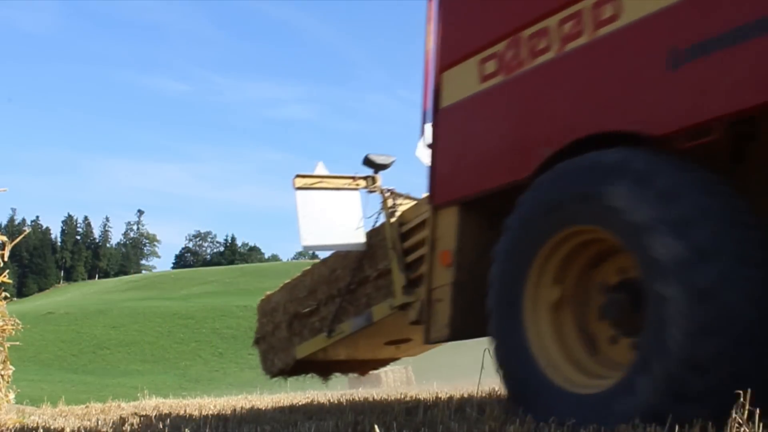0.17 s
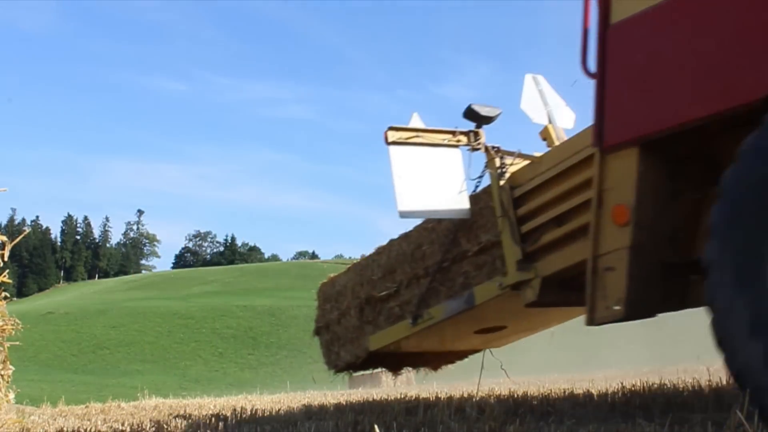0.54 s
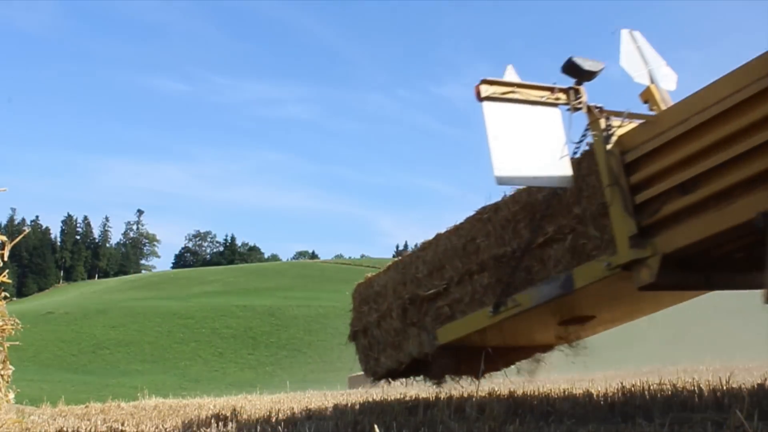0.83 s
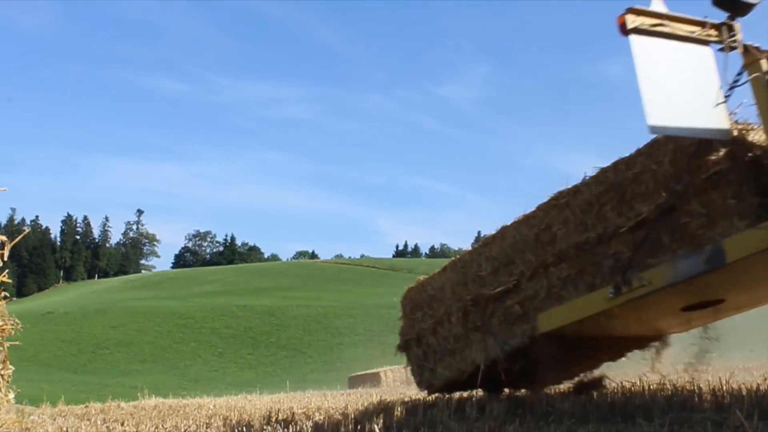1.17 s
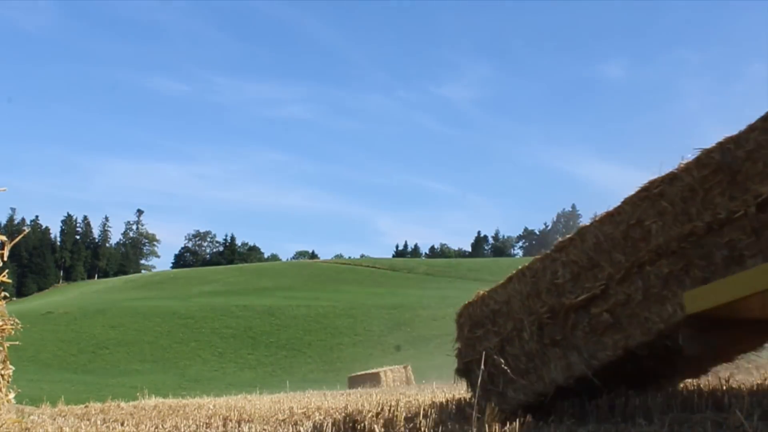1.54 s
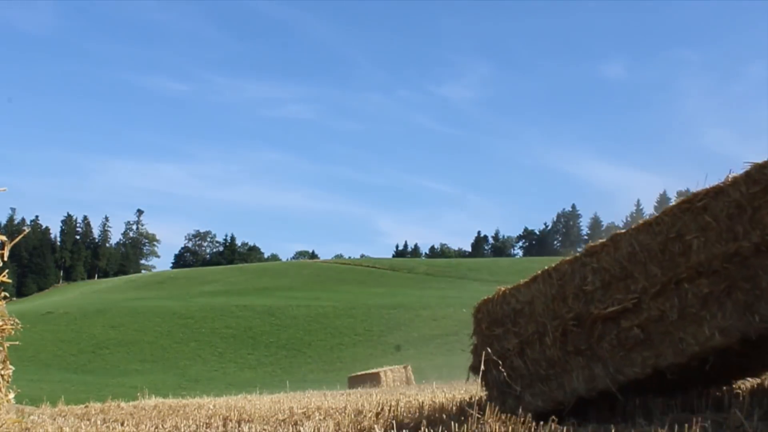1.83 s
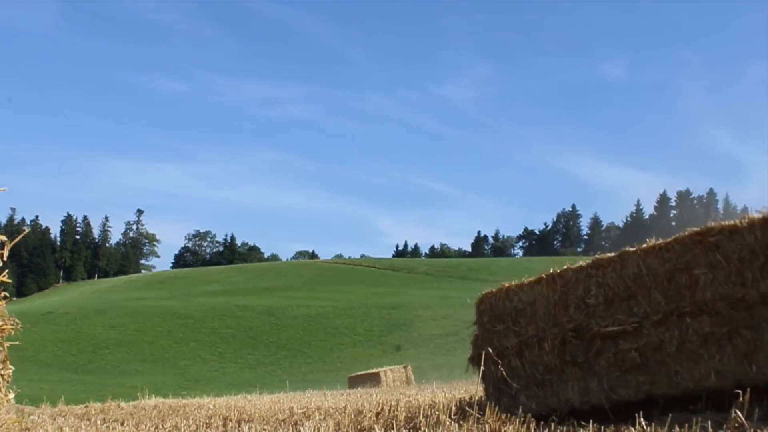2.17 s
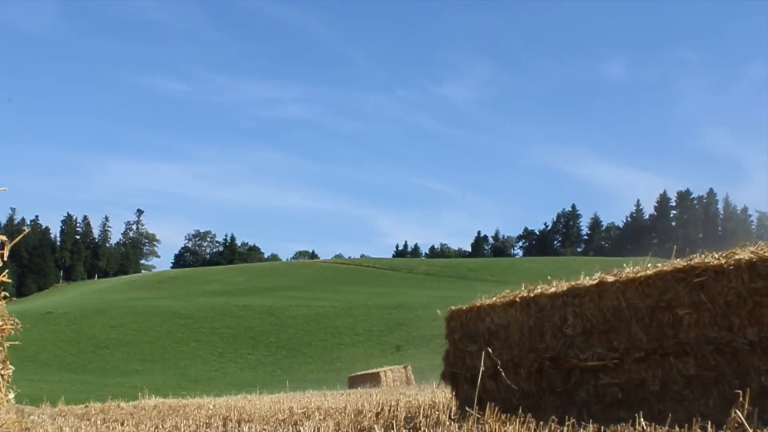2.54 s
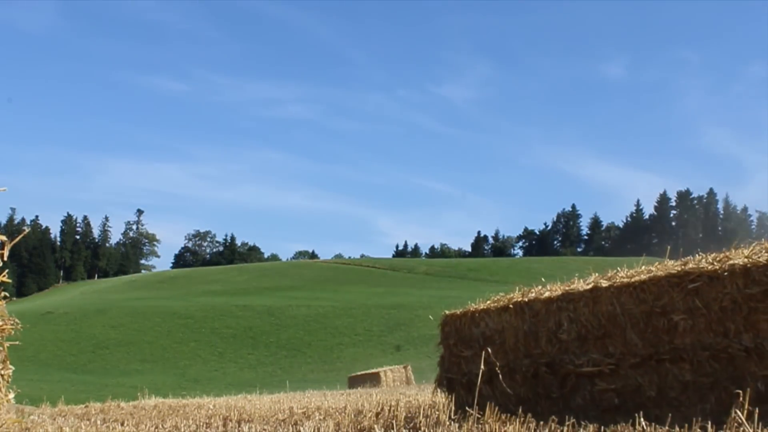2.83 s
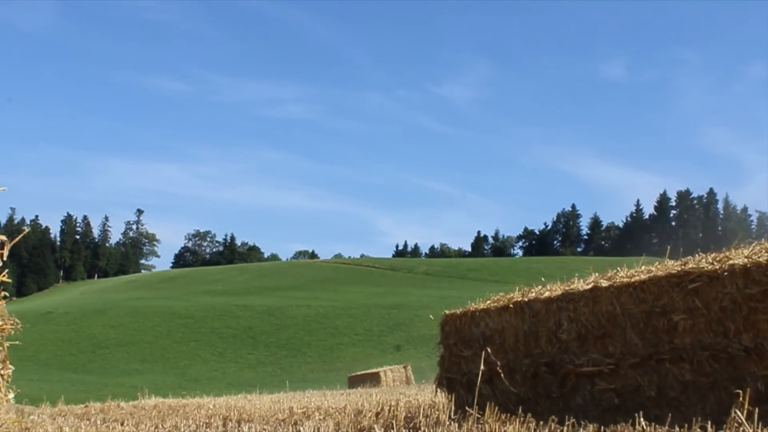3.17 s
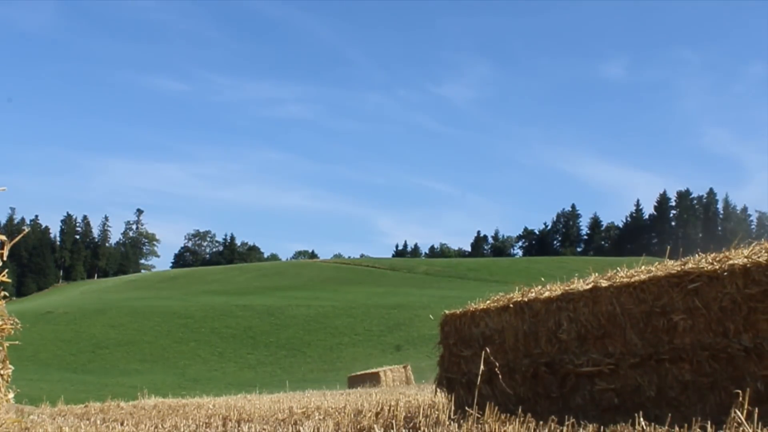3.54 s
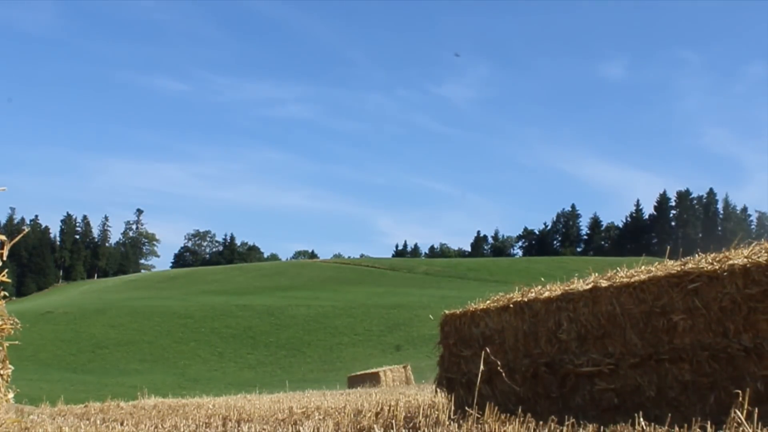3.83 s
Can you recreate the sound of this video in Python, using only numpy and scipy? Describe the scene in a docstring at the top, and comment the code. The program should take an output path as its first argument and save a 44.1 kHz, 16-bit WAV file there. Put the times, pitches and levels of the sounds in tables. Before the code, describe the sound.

A tractor and baler pass close in an open field: low engine drone near 100 Hz, heavy rumble, jolting booms, sheet-metal clatter and bangs, loudest until 0.9 s. Chain jingles, high roller squeaks and dry straw hiss overlay it. Dull knocks at 0.2, 0.65 and 1.05-1.1 s precede a ringing steel clack at 1.14 s. The machine recedes; stubble crunches softly around 2.0-2.3 s, chain slaps continue sparsely, and faint airy rush remains to 4 s.

```python
"""Engine drone and rumbling, clattering sheet metal come first: a tractor draws a square baler past and away.
A drive chain jingles and slaps, a dry roller squeaks, stubble hisses; the chute clacks, then the bale lands.
Engine, hum and squeaks are wavering sines; the rest is coloured noise under level curves and blow envelopes,
plus sine knocks in the bale chamber. Sheet metal and chute add resonant modes.
"""
import sys
import numpy as np
from scipy import signal
from scipy.fft import rfft, irfft, next_fast_len
from scipy.io import wavfile
from scipy.ndimage import uniform_filter1d, map_coordinates

SR = 44100
rng = np.random.default_rng(int(sys.argv[2]) if len(sys.argv) > 2 else 0)


def wav_out(sig):
    """Save sig, one row per channel (or a flat mono array), as 16-bit PCM at SR to the path in sys.argv[1]."""
    wavfile.write(sys.argv[1], SR, np.round(np.clip(np.atleast_2d(sig).T, -1, 1) * 32767).astype(np.int16))


N = 176400
TIME_S = np.arange(N) / SR
NEAR_UNTIL_S, FAR_FROM_S = 0.78, 2.58
TOP_HZ = 15780

# trims by layer: trim_db, added to a level curve (air: to the side noise's low band only)
TRIM_DB = {"rumble": -0.5, "clatter": 2, "chain": -1, "straw": 3, "air": -12.5}

# engine firing note: time_s, firing_hz, level_db
ENGINE_NOTE = [(0, 101, -33.5), (.6, 96, -34), (.9, 101, -38), (1.3, 106, -40), (1.7, 101, -47),
               (2.1, 102, -44.5), (2.85, 103, -49.5), (3.3, 104, -55), (4, 102, -54.5)]
# drive shaft hum: pitch_hz, near_level_db, far_level_db
SHAFT_HUM = [(155.3, -38.5, -60.5), (220.4, -38.5, -65), (271.7, -40, -51), (318.3, -50, -59.5),
             (372, -39, -64), (570, -50, -62)]
NOTE_WAVER_NEAR_HZ, NOTE_WAVER_FAR_HZ, HUM_WAVER_HZ = 5.77, 2.45, 8

# housing rumble before trim: time_s, level_db
RUMBLE_LEVEL = [(0.0, -28.5), (0.04, -20.5), (0.2, -24.5), (0.5, -24), (0.55, -21.5), (0.62, -27),
                (0.65, -20.5), (0.72, -25.5), (0.81, -19.5), (0.87, -24.5), (1.2, -30.5), (1.68, -36.5),
                (1.95, -35.5), (2.2, -36), (2.94, -44.5), (3.64, -45), (4.0, -48)]
# housing colour, near: freq_hz, gain_db
BODY_NEAR_COLOUR = [(20, -54), (45, -26), (65, -24), (85, -1.5), (125, -4), (220, 0.5), (290, -1),
                    (340, -5.5), (480, -8.5), (700, -13.5), (1100, -23), (1800, -31.5), (4000, -85)]
# housing colour, far: freq_hz, gain_db
BODY_FAR_COLOUR = [(20, -48), (45, -24), (65, -13.5), (90, -3.5), (125, -3.5), (290, 0), (350, -6.5),
                   (480, -6.5), (830, -14.5), (1020, -22), (1600, -31.5), (4000, -83)]
# heavy machinery jolts: start_s, hold_s (rattle only), rattle_level_db, boom_level_db
MACHINE_JOLTS = [(0.051, 0.016, -30.5, -19), (.133, 0.024, -32.5, -27), (0.516, 0.016, -30.5, -27),
                 (.662, 0.03, -33, -19), (0.776, .02, -38.5, -23), (.861, .012, -39, -39)]
BOOM_RISE_S, BOOM_T60_S = 0.0043, 0.18
# dull bale chamber knocks: start_s, level_db
CHAMBER_KNOCKS = [(0.228, -16), (0.649, -12), (1.054, -15), (1.097, -9.5)]
KNOCK_HZ, KNOCK_RISE_S, KNOCK_T60_S = 220, 0.0023, 0.022

# panel and tine clatter before trim and ring: time_s, level_db
CLATTER_LEVEL = [(0.0, -32), (0.43, -37), (0.65, -38), (1.54, -49.5), (1.75, -50), (2.15, -54), (2.27, -54),
                 (2.78, -56.5), (4.0, -71)]
# rattling panel colour: freq_hz, gain_db
PANEL_COLOUR = [(200, -47), (600, 4.5), (1000, 2), (1600, -5), (2600, -2.5), (4200, -6.5), (5500, -13.5),
                (8000, -18), (15000, -33.5)]
RATTLE_RISE_S, RATTLE_T60_S = 0.00093, 0.099
# loose panel bangs before ring: start_s, level_db
PANEL_BANGS = [(.148, -24), (.525, -22), (.784, -25), (.802, -25.5), (.862, -27)]
# bang colour: freq_hz, gain_db
BANG_COLOUR = [(150, -13), (450, 0.5), (750, 3), (1300, -13), (2300, -7.5), (3500, -20), (9000, -41)]
BANG_RISE_S, BANG_T60_S = 0.0005, 0.075
# sheet metal modes: freq_hz, width_hz, gain_db
SHEET_MODES = [(1282, 10, -1), (1465, 13, -6), (1653, 14, -11), (2086, 20, -7), (2330, 23, -4),
               (2600, 15, -6), (3250, 23, -4), (4600, 13, -2)]

# chain jingle before trim: time_s, level_db
CHAIN_LEVEL = [(0.0, -31.5), (0.18, -43), (0.51, -40), (1.79, -50), (2.08, -46), (2.22, -51), (3.2, -56),
               (3.51, -50.5), (3.66, -58), (4.0, -63.5)]
# chain link colour: freq_hz, gain_db
LINK_COLOUR = [(1200, -50.5), (2000, -10.5), (2550, -5), (3000, -2), (3550, 5.5), (3950, -0.5),
               (4500, -14.5), (6000, -40), (12000, -42)]
# chain slaps: start_s, level_db
CHAIN_SLAPS = [(0.33, -32), (0.982, -36.5), (1.365, -41.5), (1.489, -39), (1.522, -43), (1.732, -37),
               (1.782, -47), (1.851, -50), (1.986, -38), (2.355, -45), (2.48, -46.5), (3.081, -46.5),
               (3.612, -44.5)]
# slap colour: freq_hz, gain_db
SLAP_COLOUR = [(1500, -27), (2800, -13.5), (3600, -0.5), (4000, -10), (4600, -22), (10000, -30)]
SLAP_RISE_S, SLAP_T60_S = 0.00063, 0.12

# straw hiss before trim: time_s, level_db
STRAW_LEVEL = [(0.0, -48), (0.85, -51.5), (1.2, -54), (1.5, -51.5), (2.44, -60), (4.0, -65.5)]
# dry stalk colour: freq_hz, gain_db
STALK_COLOUR = [(1000, -7.5), (3000, 6), (6000, 1.5), (9000, 0), (12000, -1.5), (16000, -3)]
# straw scraping on steel: centre_s, length_s, level_db
STEEL_SCRAPES = [(.52, 0.016, -50.5), (1.261, 0.012, -42)]

# diffuse side noise: time_s, level_db
SIDE_LEVEL = [(0, -65), (1.8, -58.5), (3, -58), (4, -60.5)]
# diffuse side noise, low band colour: freq_hz, gain_db
SIDE_LOW_COLOUR = [(30, 11), (250, -5.5), (600, 4), (2600, -15), (9000, -52)]
# field sound, high band colour: freq_hz, gain_db
AIR_HIGH_COLOUR = [(500, -28), (3700, -32), (4500, -7), (6300, -0.5), (9000, 1), (16000, 0.5)]

# dry roller squeaks: centre_s, pitch_hz (at centre, before waver), level_db (short part)
ROLLER_SQUEAKS = [(.005, 7970, -40), (.057, 7900, -37), (.12, 7750, -48), (.375, 14900, -54),
                  (.432, 14850, -54), (0.792, 7800, -44), (0.838, 8050, -53), (0.89, 8100, -49),
                  (.962, 8160, -48), (1.009, 8200, -49), (1.125, 7850, -49), (1.813, 7730, -53),
                  (2.55, 7700, -64), (2.652, 7980, -58), (2.769, 8020, -59), (2.823, 8300, -57.5)]
SQUEAK_LENGTH_S, SQUEAK_RISE_HZ_PER_S, SQUEAK_WAVER_HZ = 0.014, 2300, 112
LONG_NOTE_DB, LONG_NOTE_LENGTH_S = -9.5, 0.071

# chute clacks before ring: start_s, level_db
CHUTE_CLACKS = [(1.1385, -23), (1.147, -27.5), (1.160, -36)]
# clack colour: freq_hz, gain_db
CLACK_COLOUR = [(300, -20), (1300, -13), (1900, 0), (2600, 2), (4400, 4), (5200, -6.5), (9500, -13.5),
                (12000, -22), (16000, -27)]
# steel chute modes: freq_hz, width_hz, gain_db
CHUTE_MODES = [(1805, 33, -3), (2600, 15, 4), (3510, 20, 4.5), (3940, 15, 7), (4575, 12, 7),
               (5860, 18, 10.5)]
CLACK_RISE_S, CLACK_T60_S = 0.0006, 0.085

# bale crushing stubble: centre_s, length_s, level_db
BALE_CRUNCHES = [(2.013, 0.068, -46.5), (2.086, 0.052, -43.5), (2.196, 0.077, -43.5), (2.282, .045, -54)]
# crushed stubble colour: freq_hz, gain_db
CRUSH_COLOUR = [(150, -6), (500, -2), (1100, 4), (1700, -6), (3000, 0.5), (4600, -3.5), (6000, -12),
                (15000, -26)]


def amp(db):
    """Amplitude factor from dB."""
    return 10 ** (np.asarray(db) / 20)


def unit(x):
    """x at rms 1."""
    return x / np.sqrt(np.mean(x ** 2) + 1e-20)


def curves(rows):
    """One value per sample for each column after the time."""
    time_s, *columns = np.transpose(rows)
    return [np.interp(TIME_S, time_s, column) for column in columns]


def wobble(knots_per_s):
    """Smooth random curve through random knots."""
    return map_coordinates(rng.standard_normal(4000), [TIME_S * knots_per_s + 2], mode="wrap")


def colour(x, points):
    """x through a causal minimum-phase filter of (freq_hz, gain_db) points, at rms 1."""
    size = 2 * next_fast_len(N // 2 + 8192)
    point_hz, point_db = np.transpose(points)
    log_hz = np.log(np.fft.rfftfreq(size, 1 / SR) + 1)
    gain_db = np.interp(log_hz, np.log(point_hz), point_db)
    # folded cepstrum: minimum phase
    cepstrum = irfft(np.log(amp(gain_db)))
    cepstrum[1:size // 2] *= 2
    cepstrum[size // 2 + 1:] = 0
    response = np.exp(rfft(cepstrum))
    return unit(irfft(rfft(x, size) * response)[:N])


def contacts(rate_hz, spread_db, t60_s, wash):
    """Random impacts as decaying noise bursts over steady noise; wash = steady / mean impact power."""
    struck = rng.random(N) < rate_hz / SR
    hit_power = struck * amp(spread_db * (2 * rng.random(N) - 1)) ** 2
    power_decay = np.exp(-2 * np.log(1000) / (t60_s * SR))
    power = signal.lfilter([1], [1, -power_decay], hit_power)
    return unit(np.sqrt(power / power.mean() + wash) * rng.standard_normal(N))


def strike(start_s, rise_s, t60_s, hold_s=0):
    """Blow envelope: exponential rise, optional hold, exponential decay."""
    t_s = np.maximum(TIME_S - start_s, 0)
    decay = np.exp(-np.log(1000) * np.clip((t_s - hold_s) / t60_s, 0, 10))
    return (1 - np.exp(-t_s / rise_s)) * decay


def swell(centre_s, length_s):
    """Gaussian envelope; length_s is two standard deviations."""
    return np.exp(-np.minimum(2 * ((TIME_S - centre_s) / length_s) ** 2, 50))


def tone(pitch_hz, waver_hz, flutter_db):
    """Sine of unsteady pitch and level, at rms 1."""
    phase = 2 * np.pi * np.cumsum(pitch_hz + waver_hz * wobble(18)) / SR
    return unit(np.sin(phase) * amp(flutter_db * wobble(14)))


def churn(points, evenness):
    """Coloured noise of overlapping motion, its chance lumps partly evened out."""
    x = colour(rng.standard_normal(N), points)
    smooth_once = uniform_filter1d(x ** 2, size=900)
    power = abs(uniform_filter1d(smooth_once, size=900)) + 1e-6
    return unit(x / power ** (evenness / 2))


def ringing(x, modes):
    """x plus its response through resonant steel modes."""
    size = next_fast_len(N + 8192)
    f = np.fft.rfftfreq(size, 1 / SR)
    ring = 0
    for mode_hz, width_hz, gain_db in modes:
        damping = 1j * f * width_hz
        ring = ring + amp(gain_db) * damping / (mode_hz ** 2 - f ** 2 + damping)
    return irfft(rfft(x, size) * (1 + ring), size)[:N]


def farness():
    """0 while the machine is near, rising to 1 when far."""
    return np.clip((TIME_S - NEAR_UNTIL_S) / (FAR_FROM_S - NEAR_UNTIL_S), 0, 1)


def engine():
    """Firing note, wavering most when near, plus drive shaft hum: unsteady sines."""
    firing_hz, level_db = curves(ENGINE_NOTE)
    far = farness()
    waver_hz = NOTE_WAVER_NEAR_HZ + (NOTE_WAVER_FAR_HZ - NOTE_WAVER_NEAR_HZ) * far
    note = amp(level_db) * tone(firing_hz, waver_hz, flutter_db=1)
    hum = sum(amp(near_db + (far_db - near_db) * far) * tone(pitch_hz, HUM_WAVER_HZ, flutter_db=5)
              for pitch_hz, near_db, far_db in SHAFT_HUM)
    return note + hum


def body():
    """Moving parts rumble the housing, jolts boom it; decaying sines knock in the bale chamber."""
    far = farness()
    near_noise = churn(BODY_NEAR_COLOUR, evenness=0.4)
    far_noise = churn(BODY_FAR_COLOUR, evenness=0.18)
    crossfade = np.sqrt(1 - far) * near_noise + np.sqrt(far) * far_noise
    rumble = amp(curves(RUMBLE_LEVEL)[0] + TRIM_DB["rumble"]) * crossfade
    boom_level = sum(amp(db) * strike(s, BOOM_RISE_S, BOOM_T60_S) for s, _, _, db in MACHINE_JOLTS)
    booms = boom_level * churn(BODY_NEAR_COLOUR, evenness=0.56)
    knocks = sum(amp(db) * strike(s, KNOCK_RISE_S, KNOCK_T60_S)
                 * np.sin(2 * np.pi * KNOCK_HZ * (TIME_S - s)) for s, db in CHAMBER_KNOCKS)
    return rumble + booms + knocks


def clatter():
    """Panels and tines rattle in surges and at jolts; a loose panel bangs; sheet metal rings to all."""
    surge = unit(amp(1.6 * wobble(36)))
    level = amp(curves(CLATTER_LEVEL)[0] + TRIM_DB["clatter"])
    run = level * surge * contacts(rate_hz=130, spread_db=0.5, t60_s=0.097, wash=3.3)
    jolt_level = sum(amp(db) * strike(s, RATTLE_RISE_S, RATTLE_T60_S, hold_s)
                     for s, hold_s, db, _ in MACHINE_JOLTS)
    rattle = run + jolt_level * contacts(rate_hz=310, spread_db=6, t60_s=0.012, wash=1)
    bang_level = sum(amp(db) * strike(s, BANG_RISE_S, BANG_T60_S) for s, db in PANEL_BANGS)
    bangs = bang_level * churn(BANG_COLOUR, evenness=1)
    return ringing(rattle.std() * colour(rattle, PANEL_COLOUR) + bangs, SHEET_MODES)


def chain():
    """Links jingle over sprockets as small impacts; slaps are decaying noise bursts."""
    links = contacts(rate_hz=130, spread_db=5, t60_s=0.02, wash=1.7)
    jingle = amp(curves(CHAIN_LEVEL)[0] + TRIM_DB["chain"]) * colour(links, LINK_COLOUR)
    slap_level = sum(amp(db) * strike(s, SLAP_RISE_S, SLAP_T60_S) for s, db in CHAIN_SLAPS)
    return jingle + slap_level * colour(rng.standard_normal(N), SLAP_COLOUR)


def straw():
    """Dry stalks hiss and crackle as small impacts; brief swells scrape on steel."""
    hiss_level = amp(curves(STRAW_LEVEL)[0] + TRIM_DB["straw"])
    scrape_level = sum(amp(db) * swell(s, length_s) for s, length_s, db in STEEL_SCRAPES)
    stalks = contacts(rate_hz=240, spread_db=7, t60_s=0.0072, wash=5)
    return (hiss_level + scrape_level) * colour(stalks, STALK_COLOUR)


def side_noise():
    """Diffuse side noise: a rush of the field in the high band, plus a faint low band."""
    low = colour(rng.standard_normal(N), SIDE_LOW_COLOUR)
    high = colour(rng.standard_normal(N), AIR_HIGH_COLOUR)
    return amp(curves(SIDE_LEVEL)[0]) * (high + amp(TRIM_DB["air"]) * low)


def roller():
    """Dry roller squeaks: short rising sines, each the peak of a fainter, longer note."""
    waver_hz = SQUEAK_WAVER_HZ * wobble(350)
    squeaks = np.zeros(N)
    for centre_s, pitch_hz, level_db in ROLLER_SQUEAKS:
        rise_hz = SQUEAK_RISE_HZ_PER_S * (TIME_S - centre_s)
        phase = 2 * np.pi * np.cumsum(pitch_hz + waver_hz + rise_hz) / SR
        long_note = amp(LONG_NOTE_DB) * swell(centre_s, LONG_NOTE_LENGTH_S)
        envelope = swell(centre_s, SQUEAK_LENGTH_S) + long_note
        squeaks += amp(level_db) * envelope * np.sin(phase)
    return squeaks


def chute():
    """Steel chute clacks: dense contacts under blow envelopes, ringing its modes."""
    blow_level = sum(amp(db) * strike(s, CLACK_RISE_S, CLACK_T60_S) for s, db in CHUTE_CLACKS)
    cluster = contacts(rate_hz=3000, spread_db=2, t60_s=0.002, wash=1.2)
    return ringing(blow_level * colour(cluster, CLACK_COLOUR), CHUTE_MODES)


def bale():
    """Stalks snap under the landing bale: dense impacts under swells."""
    weight = sum(amp(db) * swell(s, length_s) for s, length_s, db in BALE_CRUNCHES)
    snaps = contacts(rate_hz=630, spread_db=1, t60_s=0.0093, wash=1)
    return weight * colour(snaps, CRUSH_COLOUR)


def scene():
    """Machine and straw in the middle; diffuse side noise in opposite polarity at the two ears: a rush of field
    air in the high band, with a faint low band beneath."""
    middle = engine() + body() + clatter() + chain() + straw() + roller() + chute() + bale()
    side = side_noise()
    return np.array([middle + side, middle - side])


def record(dry):
    """Band limit: nothing passes at or above TOP_HZ."""
    size = next_fast_len(N + 8192)
    passed = np.fft.rfftfreq(size, 1 / SR) < TOP_HZ
    return irfft(rfft(dry, size) * passed, size)[:, :N]


dry = scene()
out = record(dry)
wav_out(out)
```